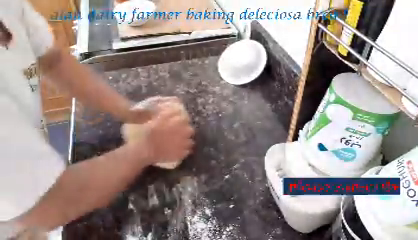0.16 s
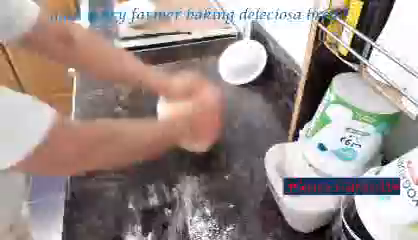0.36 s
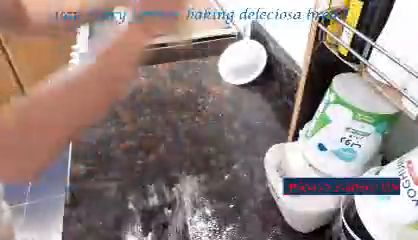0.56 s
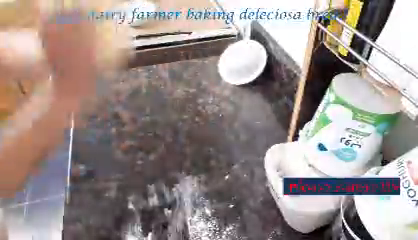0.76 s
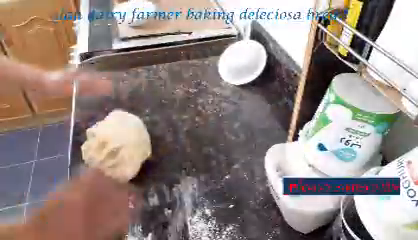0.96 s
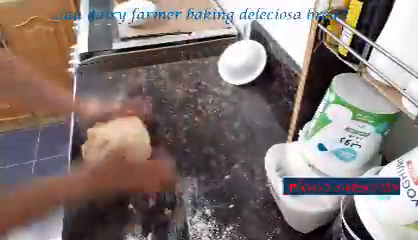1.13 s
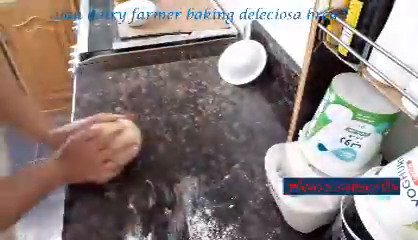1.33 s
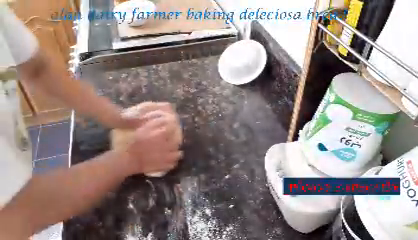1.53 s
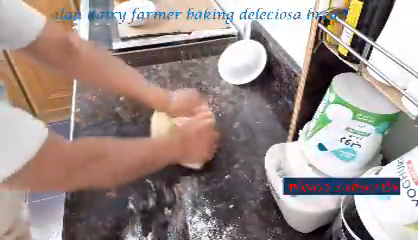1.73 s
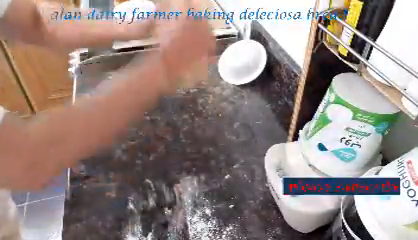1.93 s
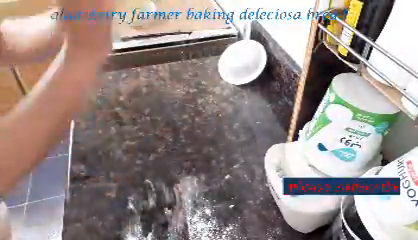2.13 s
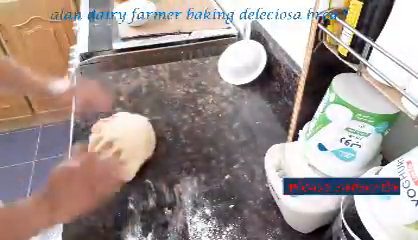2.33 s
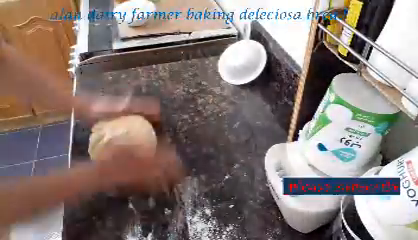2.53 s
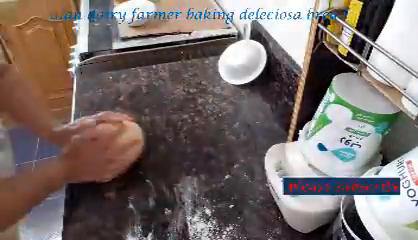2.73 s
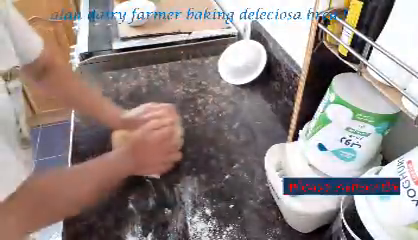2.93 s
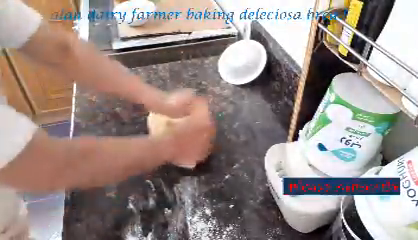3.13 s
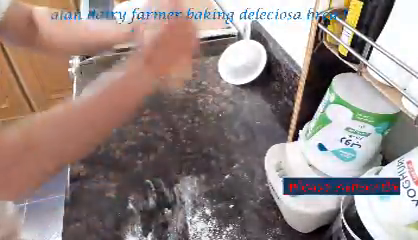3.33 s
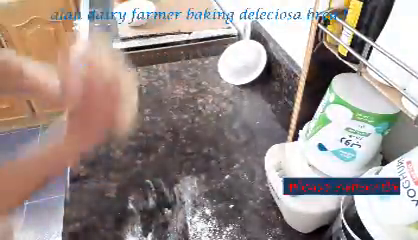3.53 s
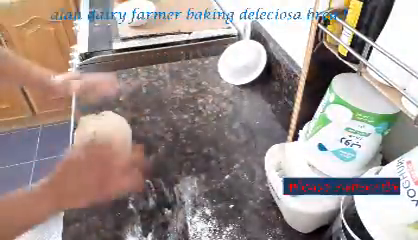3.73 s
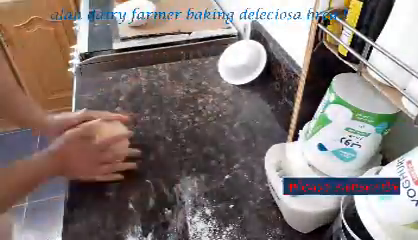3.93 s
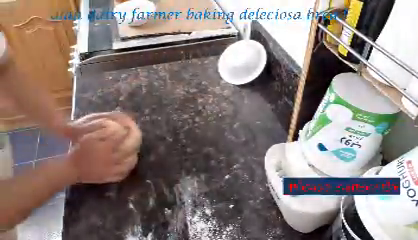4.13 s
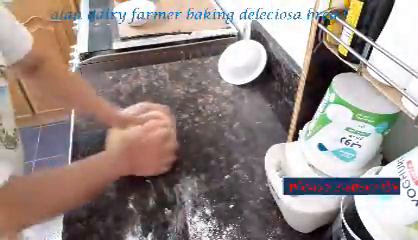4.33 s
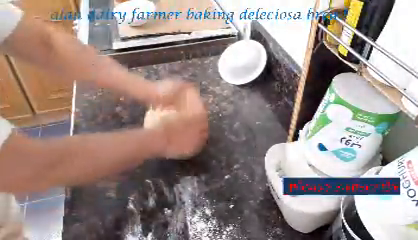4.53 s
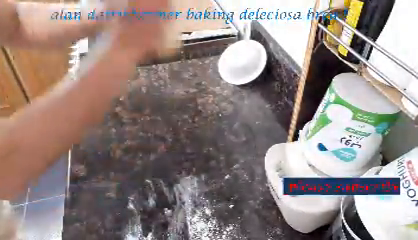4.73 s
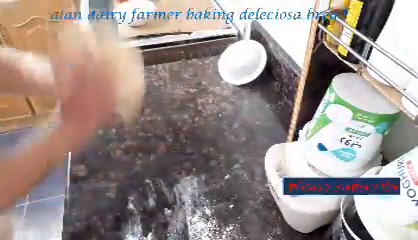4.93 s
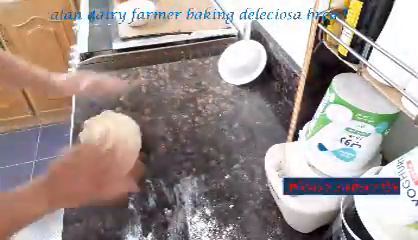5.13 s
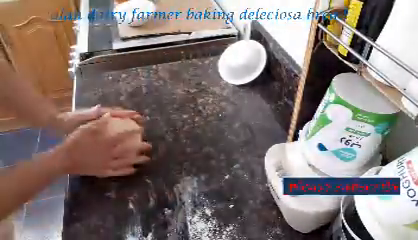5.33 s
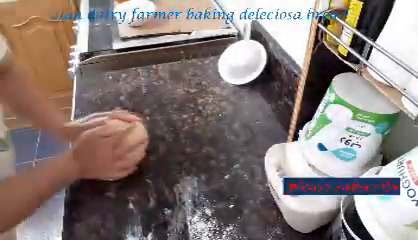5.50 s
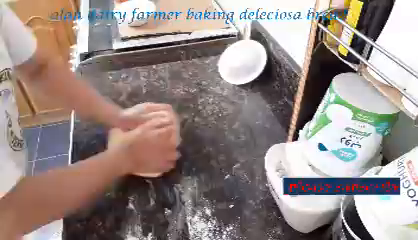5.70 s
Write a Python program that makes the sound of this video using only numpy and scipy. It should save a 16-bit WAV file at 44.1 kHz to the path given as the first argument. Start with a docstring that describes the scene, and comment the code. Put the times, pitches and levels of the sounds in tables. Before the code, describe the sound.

A small, hard-surfaced kitchen with faint low rumble, soft hiss and a barely audible high whine. Dough is pushed quietly across floured stone at the start and peels away stickily at about 0.3 s. At 0.86 s it lands with a loud, wet, flat smack: a split-second edge touch, a sharp slap, a popping crack of trapped air and a deep counter thump, followed by a bright reverberation of under half a second. Soft palm thuds and a cupped finger slap follow around 1.1 s, then faint grainy sliding from 1.35 s and a peel at 1.7 s. The cycle repeats with smacks at 2.26, 3.62 and 5.03 s, each differently coloured, the last with a weaker air crack. Pats come near 2.5, 3.9 and 5.2 s; peels near 3.1, 4.5 and 5.9 s. The handling is far quieter than the blows. The microphone is close, with the dough slightly right.

```python
"""Four wet smacks of dough thrown on a stone countertop ring in a small, hard-walled kitchen.
Each smack is short bursts of contact noise, with damped tones for pops of trapped air and a deep thump of the counter.
Between them hands pat, fold, slide and peel the dough: shaped noise, with a soft thud and a cupped-air tone in each pat.
Reflections follow the blows and pats; a faint room rumble, hiss and high whine lie underneath."""
import sys
import numpy as np
from scipy import signal
from scipy.fft import rfft, irfft
from scipy.io import wavfile
from scipy.ndimage import uniform_filter1d

SR = 44100
rng = np.random.default_rng(int(sys.argv[2]) if len(sys.argv) > 2 else 0)


def unload_wav(signal):
    """Save mono or channel-first audio to the path in sys.argv[1] as 16-bit WAV at rate SR, clipped to [-1, 1]."""
    wavfile.write(
        sys.argv[1],
        SR,
        np.round(np.clip(np.atleast_2d(signal).T, -1, 1) * 32767).astype(np.int16),
    )


N = 254016
TIME = np.arange(N) / SR
HZ = np.maximum(np.arange(N // 2 + 1) * SR / N, 1)

# left-right correlation of diffuse sound in the room: pitch_hz, likeness (-1 to 1)
LIKENESS = [(100, 1), (280, 1), (500, .5), (1000, 0.055), (3000, -0.49), (12000, -0.19)]
# dough pushed over the floured stone, then peeled off; hiss is relative to the friction noise:
# start_s, peel_s, hiss_db, rumble_db, peel_db
SLIDES = [(-.005, .31, -74.5, -65, -56.5), (1.349, 1.73, -74.5, -81, -57.5), (2.75, 3.104, -68.5, -80, -54),
          (4.069, 4.495, -71.5, -82, -54), (5.60, 5.93, -70.5, -70.5, -59.5)]
# one row per throw: face_lands_s, edge_lead_s, edge_db, face_db, face_treble_db, spread_db,
# crack_hz, crack_db, settle_s (until the weight bears on the slab), thump_db, knock_db (of the cabinet)
LANDINGS = [(.8617, .0066, -23.5, -15, 6.5, -16.5, 717, -17.5, .0063, -14, -27.5),
            (2.2620, .0057, -25, -13.5, -9, -16, 1060, -6, .0145, -15, -33.5),
            (3.6162, .0045, -36.5, -10, 3, -19.5, 848, -9.5, .0098, -14, -30),
            (5.0279, .0028, -37.5, -16.5, 0, -27.5, 1440, -26, 0.012, -15, -37.5)]


def from_db(db):
    """Logarithmic level: 20 dB is a tenfold amplitude."""
    return 10 ** (np.asarray(db) / 20)


def rms_one(x):
    """Normalization: scale a signal to unit rms."""
    return x / np.sqrt(np.mean(x ** 2) + 1e-20)


def at_hz(points, hz):
    """Interpolation of a spectrum on a logarithmic frequency axis."""
    table = np.array(points)
    return np.interp(np.log(hz), np.log(table[:, 0]), table[:, 1])


def treble(corner_hz=3300):
    """Shelving response: rises from 0 to 1 around the corner."""
    return 1 - 1 / (1 + (HZ / corner_hz) ** 4)


def hump(centre_hz, octaves):
    """Band-limited spectrum: a bell in dB over log frequency, with a floor of -100 dB."""
    distance = np.log2(HZ / centre_hz) / octaves
    return -10 * np.minimum(distance ** 2 / 2, 10)


def noise(colour_db, alike, size=N):
    """Partially correlated stereo: random-phase mid and side spectra, shaped on HZ, to rms 1."""
    hz = np.arange(size // 2 + 1) * SR / size
    alike = np.interp(hz, HZ, np.clip(alike + 0 * HZ, -1, 1))
    mid, side = np.exp(2j * np.pi * rng.random((2, len(hz))))
    pair = np.sqrt(1 + alike) * mid + np.sqrt(1 - alike) * side * [[1], [-1]]
    colour = from_db(np.interp(hz, HZ, colour_db))
    return rms_one(irfft(pair * colour, size))


def grain(depth_db):
    """Stick-slip roughness: quick random unevenness of a sticky contact, as a gain."""
    unevenness = uniform_filter1d(rng.standard_normal(N), size=200)
    return from_db(depth_db * rms_one(unevenness))


def splat(decay, colour_db, alike=.1, rise=.00025):
    """Superposed impacts: countless tiny contacts close at once and die out as the skin settles."""
    size = 2 ** int(np.ceil(np.log2(2 * np.pi * decay * SR)))
    t = TIME[:size]
    fade = (1 - np.exp(-t / rise)) * np.exp(-t / decay)
    # the phase keeps the timing, while the colour alone sets the magnitude
    phase = np.angle(rfft(noise(0 * HZ, alike, size) * fade))
    hz = np.arange(size // 2 + 1) * SR / size
    burst = irfft(np.exp(1j * phase) * from_db(np.interp(hz, HZ, colour_db)), size)
    return rms_one(burst * (1 - t / t[-1])) * np.sqrt(np.mean(fade ** 2))


def pop(hz, db, t60):
    """Damped resonance: an air pocket rings and is damped by the dough."""
    t = TIME[:SR // 10]
    return -np.sin(2 * np.pi * hz * t) * from_db(db - 60 * t / t60)


def push(hz, width):
    """Flexure under a soft mass: a brief swing that swells and dies; returns it and its lead in s."""
    lead = np.pi * width
    t = TIME[:int(2 * lead * SR)] - lead
    return np.cos(2 * np.pi * hz * t) * np.exp(-(t / width) ** 2), lead


def ringing(modes, swell):
    """Modal superposition: one second of decaying modes that take a moment to build up."""
    t = TIME[:SR]
    waves = sum(np.cos(2 * np.pi * hz * t) * from_db(db - 60 * t / t60) for hz, db, t60 in modes)
    return waves * (1 - np.exp(-t / swell))


def skin(treble_db):
    """Soft-contact spectrum: the colour of skin on dough, brighter or duller."""
    # palms on soft dough: pitch_hz, level_db (per Hz)
    palm_colour = [(100, -17), (400, 4), (750, -4.5), (1900, -3), (2800, -10), (6000, -11.5), (8400, -10.5),
                   (10000, -14), (12000, -15.5)]
    return at_hz(palm_colour, HZ) + treble_db * treble()


def add(track, s, sound):
    """Linear superposition: mix a sound into a track at a time in seconds."""
    start = int(round(s * SR))
    part = sound[..., :max(N - start, 0)]
    track[..., start:start + part.shape[-1]] += part


def pan(x, left_db):
    """Interaural level difference: raise the left over the right by left_db."""
    return x * from_db([[left_db / 2], [-left_db / 2]])


def background(floor_db=-68, rumble_below_hz=770, whine_db=-93):
    """Stationary noise floor: a slowly swelling rumble and steady hiss, with a very faint high whine."""
    # spectrum of the quiet kitchen: pitch_hz, level_db (per Hz)
    floor_colour = [(30, -27), (60, -13), (98, -2), (190, -15), (280, -8.5), (430, -8), (1000, -22),
                    (1900, -19.5), (2600, -29.5), (6800, -31.5), (8600, -20), (9900, -33), (12300, -30.5),
                    (14000, -42.5)]
    # level of the rumble relative to the floor: time_s, level_db
    rumble_level = [(0, -1.5), (1.6, -1.5), (3, 1), (4.4, 3.5), (5.76, 2.5)]
    whine = np.sqrt(2) * np.sin(2 * np.pi * SR / 4 * TIME)
    floor = from_db(floor_db) * noise(at_hz(floor_colour, HZ), at_hz(LIKENESS, HZ))
    hiss = irfft(rfft(floor) * treble(rumble_below_hz), N)
    rumble = floor - hiss
    swell = from_db(np.interp(TIME, *np.transpose(rumble_level)))
    return rumble * swell + hiss + from_db(whine_db) * whine


def sliding(level_db=2.5, grain_db=1.5):
    """Sliding friction: each push swells, holds and fades, a grainy hiss over a soft rumble of the slab."""
    # friction of dough on floured stone: pitch_hz, level_db (per Hz)
    friction_colour = [(590, -38), (1000, -23), (1790, 1), (2120, -20.5), (3190, -8), (3950, -11.5),
                       (8650, 0.5), (10000, -9.5), (12100, 1), (13000, -14)]
    attack_s, release_s = 0.048, 0.21
    push_hz, push_octaves = 101, .5
    hiss, rumble = np.zeros((2, N))
    for start, peel, hiss_db, rumble_db, _ in SLIDES:
        onset = np.clip((TIME - start) / attack_s, 0, 1)
        stroke = onset * np.clip(1 - (TIME - peel) / release_s, 0, 1)
        hiss += from_db(hiss_db) * stroke
        # the rumble has faded out by the time the dough lifts
        rumble += from_db(rumble_db) * stroke * np.clip((peel - TIME) / attack_s, 0, 1)
    friction = from_db(level_db) * noise(at_hz(friction_colour, HZ), alike=0.079) * grain(grain_db)
    return hiss * friction + rumble * noise(hump(push_hz, push_octaves), alike=1.0)


def peels(grain_db=3.0):
    """Adhesive release: after a soft fold and a push, the sticky underside lets go of the stone."""
    fold_after_s, fold_db, fold_decay_s, fold_treble_db = 0.04, -71, .035, 7
    peel_rise_s, peel_decay_s, peel_treble_db = 0.044, .044, 5.5
    out = np.zeros((2, N))
    for start, peel, _, _, db in SLIDES:
        fold = splat(fold_decay_s, skin(fold_treble_db), rise=.005)
        release = splat(peel_decay_s, skin(peel_treble_db), rise=peel_rise_s)
        add(out, start + fold_after_s, from_db(fold_db) * fold)
        add(out, peel, from_db(db) * release)
    return out * grain(grain_db)


def smacks():
    """Staged impact: an edge touches, the whole face slaps down, the ball spreads."""
    # the dough lands in a new shape each time, so the air gap under it colours each throw differently;
    # one list per throw: pitch_hz, level_db (per Hz)
    air_gaps = [
        [(210, -32), (350, -2), (479, -3.5), (637, -12), (968, -12), (1060, -5), (1160, -11), (2050, -6.5),
         (2600, -17), (3060, -14), (4450, -20), (5830, -17), (12500, -25.5), (16200, -57), (22000, -120)],
        [(210, -29.5), (350, 3.5), (406, -12.5), (557, -1.5), (707, -7.5), (912, -4.5), (1250, -9.5),
         (2170, -5), (3300, -14.5), (5920, -14), (7520, -17), (8860, -15.5), (12500, -22.5), (16200, -51.5),
         (22000, -120)],
        [(210, -36.5), (350, -4.5), (377, 2), (413, -6), (618, -10), (762, -3), (983, -8.5), (1060, -8),
         (1290, -16.5), (1900, -13), (2890, -21), (8600, -15), (12500, -20.5), (16200, -55), (22000, -120)],
        [(210, -31), (350, -3), (445, -3), (697, -18), (821, -8), (885, -20), (1060, 0), (1160, -14.5),
         (1430, -3), (1960, -10), (2800, -10.5), (8600, -11), (12500, -18), (16200, -54), (22000, -120)],
    ]
    edge_decay_per_lead, edge_treble_db = 1.5, 3.5  # a slanted landing rolls on for longer
    face_decay_s = .003
    # the ball flattens and its rim slaps outwards
    spread_after_touch_s, spread_decay_s, spread_treble_db = .01, .0074, -1.5
    out = np.zeros((2, N))
    for (s, lead, edge_db, face_db, treble_db, spread_db, *_), air_gap in zip(LANDINGS, air_gaps):
        colour, touch = at_hz(air_gap, HZ), s - lead
        edge = splat(edge_decay_per_lead * lead, colour + edge_treble_db * treble())
        face = splat(face_decay_s, colour + treble_db * treble())
        spread = splat(spread_decay_s, colour + spread_treble_db * treble())
        add(out, touch, from_db(edge_db) * edge)
        add(out, s, from_db(face_db) * face)
        add(out, touch + spread_after_touch_s, from_db(spread_db) * spread)
    return out


def pops(count=2):
    """Cavity resonance: trapped air escapes as a crack under the face, small blisters and large pockets."""
    # large pockets that burst out from under the dough: start_s, pitch_hz, peak_db, t60_s
    pockets = [(.8650, 385, -13, .022), (0.8655, 1910, -6, .0105), (2.2744, 293.7, -13, .09),
               (2.2758, 2206, -12.5, .007), (3.6225, 331, -9, .02), (5.0279, 1102, -31, 0.045),
               (5.0347, 356.5, -17, .012)]
    crack_cycles = 6  # t60 of the crack, in cycles
    # small blisters burst at random as the dough spreads
    low_hz, high_hz, blister_t60_s = 1400, 2400, .008
    blister_db, within_s = 1.0, .012  # dB relative to the spreading
    out = np.zeros(N)
    for s, _, _, _, _, spread_db, crack_hz, crack_db, *_ in LANDINGS:
        add(out, s, pop(crack_hz, crack_db, crack_cycles / crack_hz))
        for when, pitch in rng.random((count, 2)):
            hz = low_hz * (high_hz / low_hz) ** pitch
            add(out, s + when * within_s, pop(hz, spread_db + blister_db, blister_t60_s))
    for s, hz, db, t60 in pockets:
        add(out, s, pop(hz, db, t60))
    return out


def thumps(slab_hz=122, width=.008, boom_db=-2.0, sway_hz=42):
    """Modal excitation: the slab gives, the cabinet knocks; echoes and standing waves follow."""
    # standing waves of the kitchen, set off by the thump: pitch_hz, level_db, t60_s
    room_modes = [(53, -18.5, 0.61), (73.93, -16.5, 0.6), (97.4, -23, .8), (113, -14.5, .5),
                  (134.4, -20.5, .8), (141.4, -22, .5)]
    # panels of the cabinet under the slab: pitch_hz, level_db, t60_s
    panel_modes = [(202, -7, 0.2), (230, -4, .45), (286.7, -5, .42), (302.4, -7.5, 0.31),
                   (375.7, -4.5, 0.3), (413.6, -13, .36), (436, -11, .35), (485, -11, 0.28),
                   (522, -14, 0.26), (567, -12.5, .35), (917, -10.5, 0.21), (1127, -11.5, 0.35)]
    # the thump comes back from walls and floor: delay_s, level_db
    echoes = [(.054, -15.5), (0.062, -14)]
    swing, lead = push(slab_hz, width)
    boom, knock = ringing(room_modes, swell=0.0029), ringing(panel_modes, swell=0.0016)
    out = np.zeros(N)
    for s, *_, settle, db, knock_db in LANDINGS:
        bears = s + settle
        add(out, bears, from_db(db + boom_db) * boom + from_db(knock_db) * knock)
        add(out, bears - lead, from_db(db) * swing)
        for delay, echo_db in echoes:
            add(out, bears + delay - lead, from_db(db + echo_db) * swing)
    # slow sway of the slab radiates no sound
    return signal.sosfilt(signal.butter(4, sway_hz, "high", fs=SR, output="sos"), out)


def pats():
    """Damped impact: palms thud softly and squash the ball, cupped fingers slap and grip it."""
    # hands coming down on the dough: palms_s, thud_db, fingers_s, slap_db, grip_db
    catches = [(1.110, -44.5, 1.1352, -46, -56.5), (2.526, -38, 2.5371, -44.5, -52.5),
               (3.886, -41.5, 3.918, -37, -51.5), (5.286, -44.5, 5.16, -50, -52.5)]
    palm_hz, palm_cycles = 175, 0.65  # soft thud through the dough
    palm_skin_db, palm_decay_s, palm_treble_db = -9, 0.016, 0.5  # dB relative to the thud
    slap_decay_s, slap_treble_db = 0.004, 5.5
    cup_hz, cup_db, cup_t60_s = 470, -4, 0.016  # air cupped under the fingers; dB relative to the slap
    grip_after_slap_s, grip_decay_s, grip_treble_db = .012, 0.027, 2.5
    # the ball is squashed on the slab; dB relative to the thud
    squash_hz, squash_octaves, squash_db, squash_decay_s = 125, 0.71, -0.5, .032
    out = np.zeros((2, N))
    swing, lead = push(palm_hz, palm_cycles / palm_hz)
    for touch, thud_db, slap, slap_db, grip_db in catches:
        palm = splat(palm_decay_s, skin(palm_treble_db))
        fingers = splat(slap_decay_s, skin(slap_treble_db))
        grip = splat(grip_decay_s, skin(grip_treble_db))
        squash = splat(squash_decay_s, hump(squash_hz, squash_octaves), alike=1.0, rise=0.011)
        add(out, touch - lead, from_db(thud_db) * swing)
        add(out, touch, from_db(thud_db + palm_skin_db) * palm)
        add(out, slap, from_db(slap_db) * fingers)
        add(out, slap, pop(cup_hz, slap_db + cup_db, cup_t60_s))
        add(out, slap + grip_after_slap_s, from_db(grip_db) * grip)
        add(out, touch, from_db(thud_db + squash_db) * squash)
    return out


def kitchen(x, build_up=0.0049, first_wall=0.0021):
    """Diffuse reverberation: dense reflections build up quickly and decay at a rate set by frequency."""
    # reverberation by band: pitch_hz, level_db, t60_s
    bands = [(100, -8.5, 0.45), (260, -7, 0.38), (500, -0.5, 0.44), (1000, -1, 0.48), (2000, 0.5, 0.52),
             (4000, 1.8, 0.45), (7414, 0.5, 0.4), (12500, 1, 0.3)]
    t, hz = TIME[:SR], np.maximum(np.arange(SR // 2 + 1), 1)
    diffuse = rfft(noise(0 * HZ, at_hz(LIKENESS, HZ), size=SR))
    response = np.zeros((2, SR))
    centres = np.log([row[0] for row in bands])
    # each share is 1 at its own band centre and falls to 0 at the neighbours
    for share, (_, db, t60) in zip(np.eye(len(bands)), bands):
        band = irfft(diffuse * np.interp(np.log(hz), centres, share), SR)
        onset = 1 - np.exp(-np.maximum(t - first_wall, 0) / build_up)
        fade = np.exp(-np.log(1000) * t / t60) * onset
        response += from_db(db) * band * fade / np.sqrt(np.sum(fade ** 2))
    return signal.fftconvolve(x, response, axes=1)[:, :N]


def scene():
    """Direct and reverberant fields: dough and hands, a little to the right, over the room's rumble."""
    wet, air, hands, weight = smacks(), pops(), pats() + peels(), thumps()
    # gains into the reverberation only
    room = kitchen(from_db(-0.26) * wet + from_db(-4.5) * air + hands + from_db(-7.5) * weight)
    near = pan(wet + hands, left_db=-3.0) + pan(air, left_db=-1.5)
    near = near + pan(weight, left_db=-0.08) + pan(sliding(), left_db=-2.5)
    return near + pan(room, left_db=-3.5) + pan(background(), left_db=-5.0)


def record(dry, low_cut_hz=30, cutoff_hz=12700):
    """Band limiting: the microphone drops the deepest bass; the top is cut steeply."""
    heard = signal.sosfilt(signal.butter(2, low_cut_hz, "high", fs=SR, output="sos"), dry)
    return signal.sosfilt(signal.ellip(10, .1, 80, cutoff_hz, fs=SR, output="sos"), heard)


dry = scene()
out = record(dry)
unload_wav(out)
```